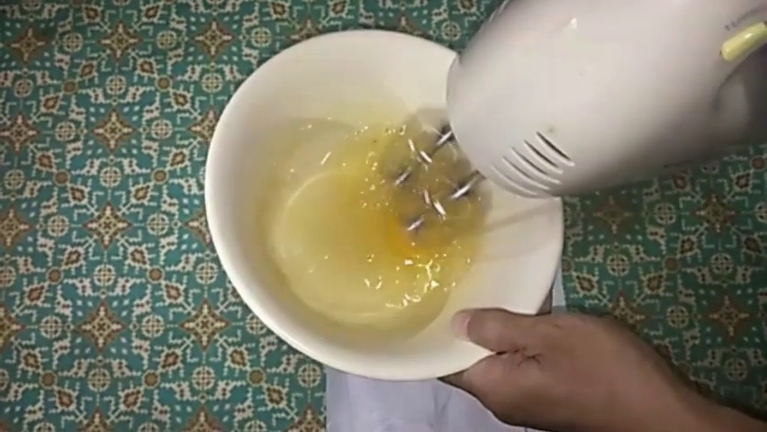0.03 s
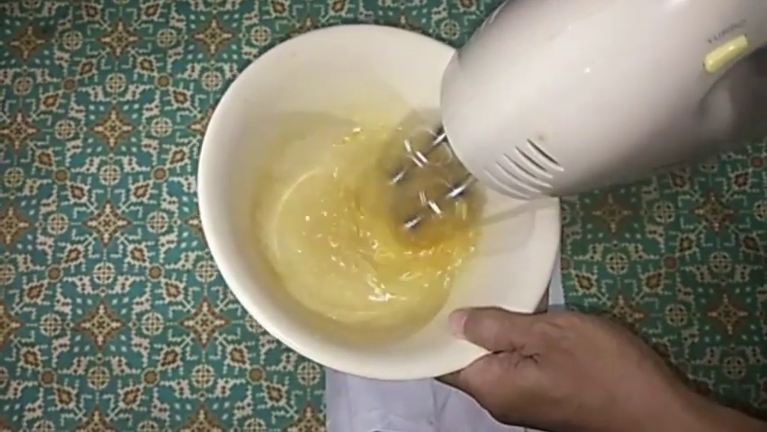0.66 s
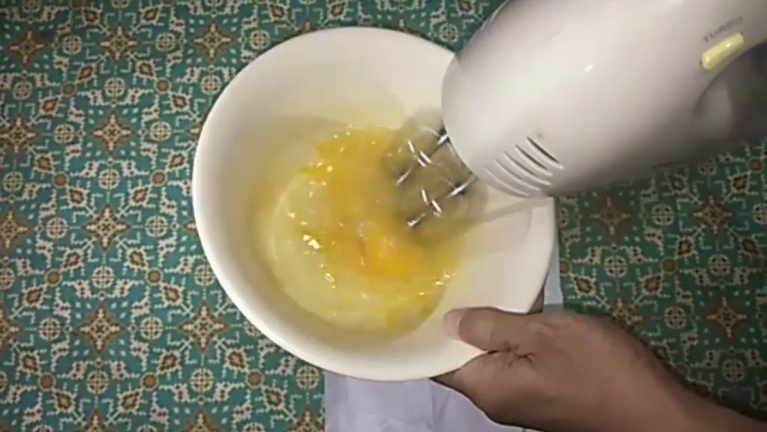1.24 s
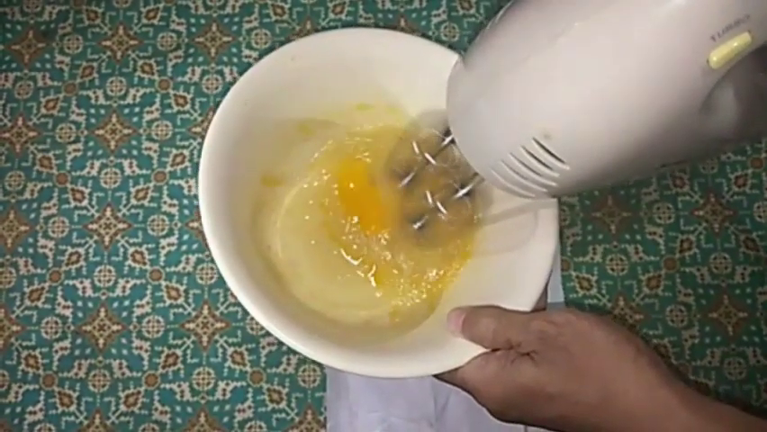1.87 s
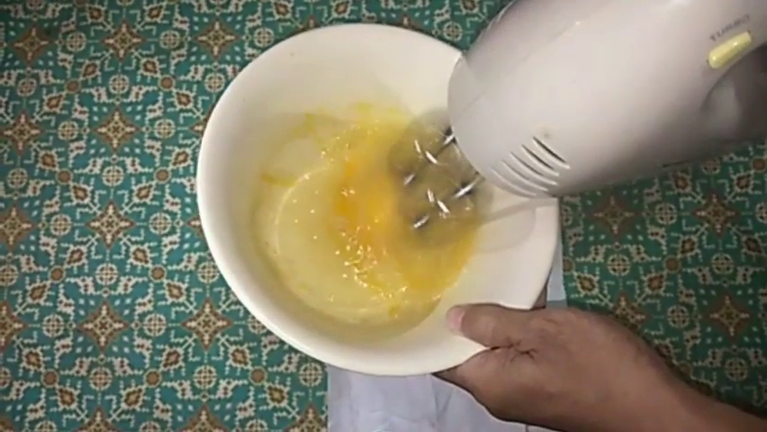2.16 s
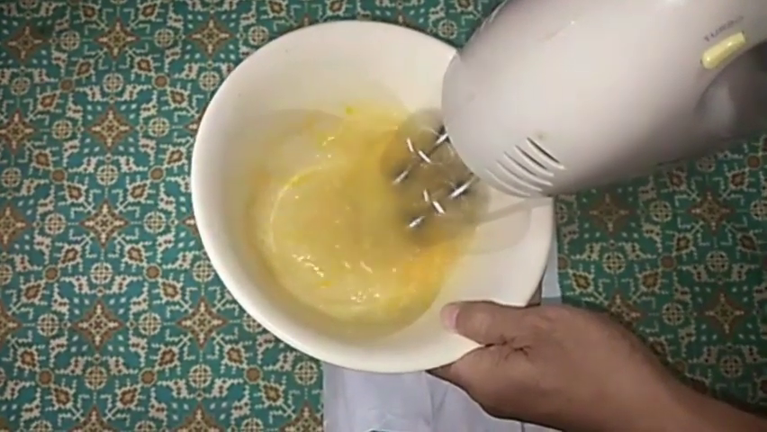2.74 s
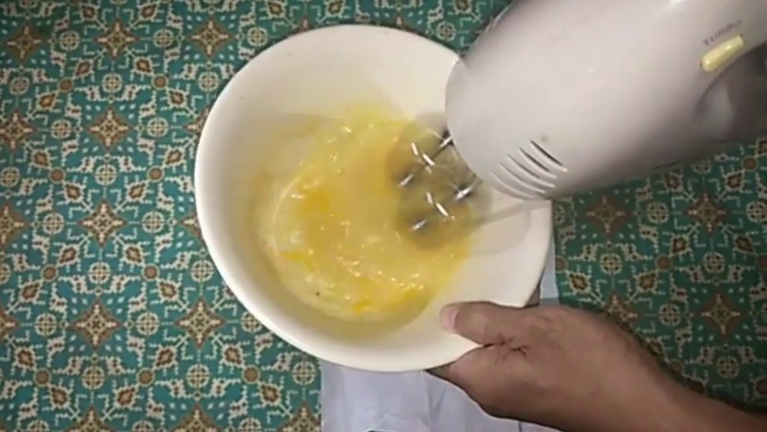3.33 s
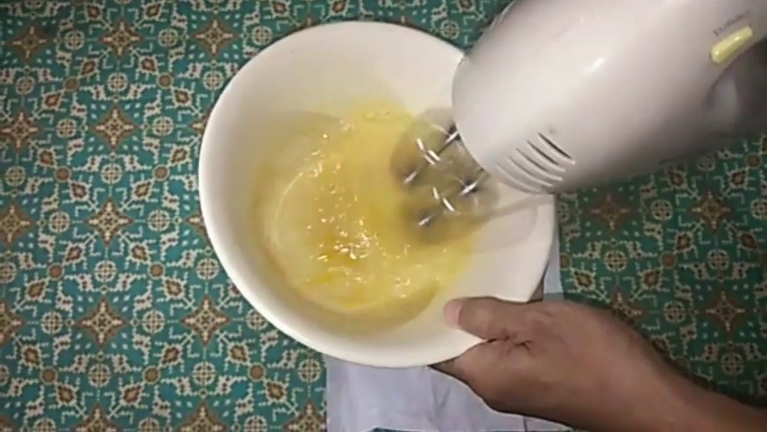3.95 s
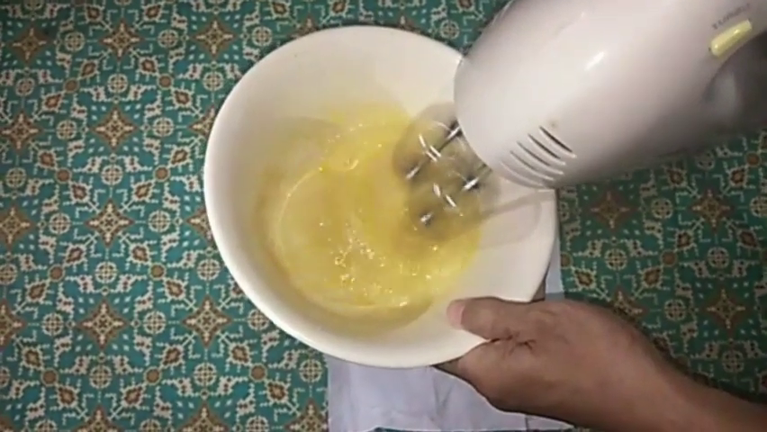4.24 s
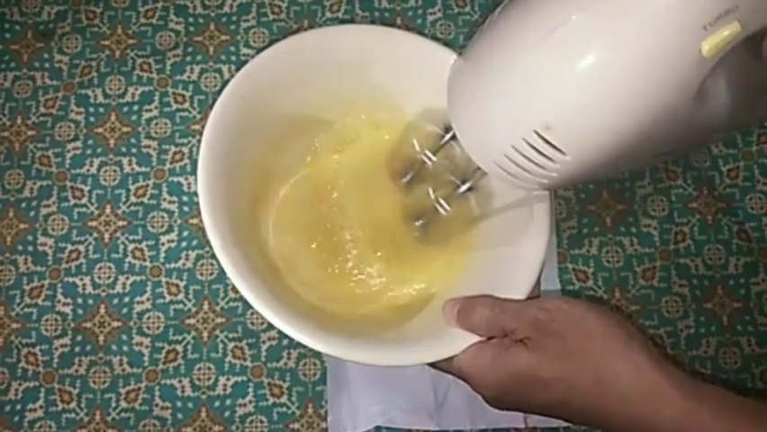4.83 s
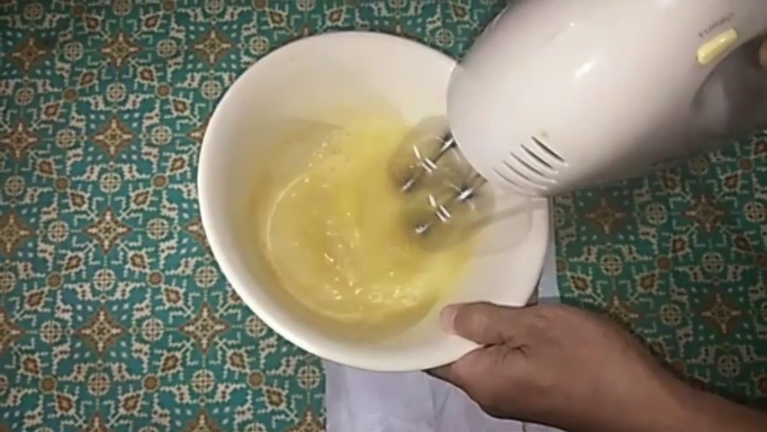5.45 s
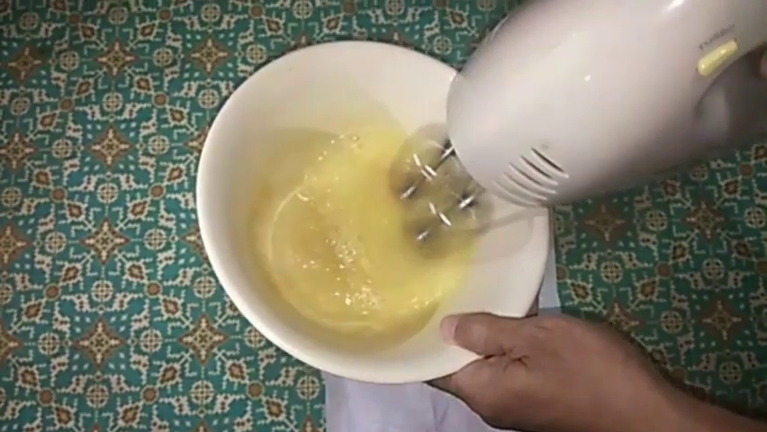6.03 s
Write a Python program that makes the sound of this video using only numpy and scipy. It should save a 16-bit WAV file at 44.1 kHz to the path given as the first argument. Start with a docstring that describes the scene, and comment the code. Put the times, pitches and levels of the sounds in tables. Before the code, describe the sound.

The steady motor whine of a hand mixer beating eggs, with soft sloshing, small wet ticks and a light knock on the bowl.

```python
"""In a kitchen, an electric hand mixer beats raw eggs in a bowl.
One shaft sets the pitch of every motor tone: unbalance hums, rotor slots and commutator bars whine,
and a worm gear turns two beaters, while the cooling fan gives a turbulent rush. The blades swish
through the egg, excite the hollow of the bowl, throw droplets against it and briefly knock on its wall."""
import sys
import numpy as np
from scipy import signal
from scipy.fft import rfft, irfft, next_fast_len
from scipy.io import wavfile
from scipy.ndimage import map_coordinates

SR = 44100
rng = np.random.default_rng(int(sys.argv[2]) if len(sys.argv) > 2 else 0)


def master(y):
    """Save y as 16-bit WAV."""
    cut = np.clip(np.atleast_2d(y).T, -1, 1)
    pcm = np.round(cut * 32767)  # scale
    wavfile.write(sys.argv[1], SR, pcm.astype(np.int16))


N = 272979
TIME = np.arange(N) / SR
SLOTS, BARS, GEAR_RATIO, BLADES = 12, 24, 20, 4
LEFT_LAG_S = 9e-5


def amp(db):
    """Decibels to amplitude ratio."""
    return 10 ** (np.asarray(db) / 20)


def unit(x):
    """Normalisation to rms 1."""
    return x / np.sqrt(np.mean(x ** 2) + 1e-20)


def curves(rows):
    """Linear interpolation of each column after the time, one value per sample."""
    seconds, *columns = np.transpose(rows)
    return [np.interp(TIME, seconds, column) for column in columns]


def wobble(rate):
    """Smooth random modulation: a spline through rate knots a second."""
    knots = rng.standard_normal(int(N * rate / SR) + 4)
    coarse = np.arange(0, N + 32, 32)
    return np.interp(np.arange(N), coarse, map_coordinates(knots, [coarse * rate / SR]))


def filtered(x, response):
    """Linear filtering: the spectrum is multiplied by a frequency response."""
    size = next_fast_len(N + SR // 4)
    return irfft(rfft(x, size) * response(np.fft.rfftfreq(size, 1 / SR)), size)[..., :N]


def coloured(x, points):
    """Spectral shaping of white noise of rms 1 to points of frequency and density in dB."""
    knots_hz, db = np.transpose(points)
    return filtered(x, lambda hz: amp(np.interp(np.log(hz + 1), np.log(knots_hz), db))) * np.sqrt(SR / 2)


def placed(x, pan_db):
    """Time and level differences give direction: the left lags, and is pan_db above the right."""
    left = filtered(x, lambda hz: np.exp(-2j * np.pi * hz * LEFT_LAG_S))
    return np.array([left * amp(pan_db / 2), x * amp(-pan_db / 2)])


def ping(t, hz, cycles):
    """Damped oscillation: a wet tick whose envelope peaks at 1 after the given cycles."""
    age = t * hz / cycles
    return age * np.exp(1 - age) * np.sin(2 * np.pi * hz * t)


def kitchen(x, t60=0.14, wet_db=-14):
    """Reverberation: hard nearby walls add a short, exponentially decaying tail."""
    t = np.arange(SR // 3) / SR
    tail = rng.standard_normal((2, len(t))) * amp(-60 * t / t60) * (t > .003)
    return x + amp(wet_db) * signal.fftconvolve(x, tail / np.linalg.norm(tail[0]), axes=1)[:, :N]


# Air through the vents. Each row: frequency in Hz, left and right spectral density in dB.
VENT_SPECTRUM = [(774, -83.5, -90), (1119, -58.5, -65.5), (1503, -67, -69), (1517, -76.5, -78),
                 (1710, -66, -66.5), (2600, -66.5, -67.5), (3470, -70.5, -70.5), (4100, -60.5, -70.5),
                 (4660, -74, -71), (6840, -69, -72.5), (7980, -66.5, -86), (9650, -75, -89),
                 (12400, -79.5, -103), (15500, -87, -80)]
def cooling_fan(angle, chop=.16, rattle_depth=.18, coherence=0.6, crossover_hz=1700):
    """Amplitude-modulated turbulence: the shaft chops the highs and the gear rattles the lows."""
    turn = angle / GEAR_RATIO
    diffuse = rng.standard_normal((2, N))
    common = placed(rng.standard_normal(N), pan_db=-3)
    rattle = 1 + rattle_depth * (-.8 * np.sin(turn) + .6 * np.cos(2 * turn) + np.cos((BLADES + 1) * turn))
    low = (np.sqrt(coherence) * common + np.sqrt(1 - coherence) * diffuse) * rattle
    high = rng.standard_normal((2, N)) * (1 + chop * np.cos(angle) + chop / 2 * np.cos(2 * angle))
    low_share = lambda hz: 1 / (1 + (hz / crossover_hz) ** 6)
    flow = filtered(low, lambda hz: np.sqrt(low_share(hz)))
    flow += filtered(high, lambda hz: np.sqrt(1 - low_share(hz)))
    flow *= amp(0.5 * wobble(6))
    return np.array([coloured(flow[ear], np.array(VENT_SPECTRUM)[:, [0, ear + 1]]) for ear in range(2)])


# Gear tones. Each row: multiple of the beater rate, relative level in dB.
GEAR_HARMONICS = [(6, -62.5), (12, -59), (19, -71), (21, -53.5), (22, -59), (25, -56), (35, -44),
                  (41, -50.5), (42, -48), (61, -47), (65, -55), (71, -45), (85, -54), (87, -57), (125, -47)]
# The harmonic just above the blade-passing tone. Each row: time in seconds, relative level in dB.
THRUM_LEVELS = [(0.0, -60), (2.25, -57.0), (2.55, -53.0), (3.0, -58), (3.55, -48.5), (3.95, -59.0),
                (4.75, -55.0), (5.4, -65.0), (5.75, -57.0), (6.19, -59)]
# Housing rumble. Each row: frequency in Hz, spectral density in dB.
HOUSING_SPECTRUM = [(25, -101), (48, -98), (66, -78), (105, -74.5), (160, -82), (250, -78), (330, -69),
                    (450, -73.5), (900, -72), (1300, -79.5), (2500, -120)]
def worm_gear(turn, shaft_hz, waver_db=3.0, gain_db=-3.0, usual_shaft_hz=343):
    """Forced vibration: the gear shakes the housing in a pattern that repeats every beater turn."""
    thrum_db, = curves(THRUM_LEVELS)
    blade_db = -59 + 2.5 * (shaft_hz - usual_shaft_hz)  # faster blades shake harder
    tones = np.zeros(N)
    for k, db in [(BLADES, blade_db), (BLADES + 1, thrum_db - 2), *GEAR_HARMONICS]:
        level = amp(db + gain_db + waver_db * wobble(9))
        tones += level * np.sin(k * turn + rng.uniform(0, 2 * np.pi) + .5 * wobble(6))
    rumble = coloured(rng.standard_normal(N), HOUSING_SPECTRUM)
    return placed(np.sqrt(2) * tones + rumble, pan_db=2)


# Narrow modes of housing and room. Each row: centre in Hz, half width in Hz, lift in dB.
NARROW_MODES = [(1729, 5, 3.5), (2402, 6, 6), (2729, 5.5, 9), (3090, 6, 7), (8190, 9, 7), (8228, 14, 2.5),
                (8254, 7, 6), (8525, 14, 7), (8605, 22, 8), (12270, 24, 9), (12350, 12, 4), (12430, 38, 7)]
def resonance(hz):
    """Resonance: the lift in dB of a tone as its pitch drifts across a mode."""
    grid = np.arange(SR // 2)
    lift_db = sum(db * np.exp(-((grid - centre) / width) ** 2) for centre, width, db in NARROW_MODES)
    return np.interp(hz, grid, lift_db)


# Motor hum. Each row: multiple of the shaft rate, left and right level in dB.
SHAFT_HARMONICS = [(1, -41, -43.5), (2, -37.5, -36.5), (3, -42, -46.5), (4, -50, -55), (5, -40.5, -51),
                   (7, -47, -50), (8, -46, -51), (9, -51, -54), (10, -51, -53), (11, -52, -48),
                   (13, -56, -55), (14, -54, -47), (15, -58, -46), (16, -53, -48), (18, -54, -58),
                   (19, -55, -54), (20, -50, -58), (21, -49, -59), (22, -50, -56), (23, -46, -57),
                   (25, -47, -65), (26, -53, -56), (27, -52, -65), (28, -53, -62), (29, -53, -63),
                   (30, -57, -64), (32, -53, -68), (33, -51, -72), (35, -58, -68), (36, -51, -61),
                   (37, -59, -64), (38, -56, -63), (39, -58, -61), (41, -63, -65)]
def shaft_hum(angle, shaft_hz, flutter_db=2, drift_db=1.5, jitter_rad=0.031):
    """Rotating unbalance drives a harmonic series; brush and bearing play make its upper tones waver."""
    out = np.zeros((2, N))
    shaken = angle + jitter_rad * wobble(70)
    lag_angle = LEFT_LAG_S * SR * angle[-1] / N
    for k, left_db, right_db in SHAFT_HARMONICS:
        looseness = min(k / 4, 1)
        lift_db = resonance(k * shaft_hz) + flutter_db * looseness * wobble(40)
        for ear, db in enumerate((left_db, right_db)):
            # short waves change phase on each side as the hand moves
            path_phase = ear * k * lag_angle + (k > 3) * wobble(1.2)
            level = amp(db + lift_db + drift_db * looseness * wobble(2.54))
            out[ear] += level * np.sin(k * shaken + path_phase)
    return np.sqrt(2) * out


# The slot tone beams about as the hand moves.
# Each row: time in seconds, left and right relative level in dB.
SLOT_BEAM = [(0.0, -30.5, -41), (0.44, -27.5, -38), (0.6, -32, -42.0), (0.85, -28.5, -44),
             (1.7, -28.5, -45.0), (1.95, -31.5, -38.0), (2.85, -28.0, -48), (3.07, -39, -45),
             (3.35, -34.5, -34), (3.5, -26.5, -38), (3.8, -31.5, -39), (4.4, -29.5, -39),
             (4.85, -23.5, -37), (5.02, -28.5, -30.5), (5.6, -34.5, -33.5), (5.75, -29.5, -38),
             (6.19, -29.5, -36)]
def motor_whine(angle, shaft_hz, mains_hz=50, rough_rad=0.11, flicker_db=1.2, shadow_db=-16):
    """Slots and bars sound at their passing frequencies; mains and beater load modulate the slot tone."""
    mains = 2 * np.pi * 2 * mains_hz * TIME  # two pulses a cycle
    load = sum(np.sin(k * angle / GEAR_RATIO) / k for k in (1, 2, 3, 5))
    pull = (1 + 0.24 * load + 0.11 * np.cos(mains)) * amp(flicker_db * wobble(21.98))
    slot_phase = SLOTS * angle + 0.1 * np.sin(mains)
    out = np.zeros((2, N))
    for ear, beam_db in enumerate(curves(SLOT_BEAM)):
        level = amp(beam_db - 0.9 + .5 * wobble(8)) * pull
        out[ear] += level * np.sin(slot_phase + rough_rad * wobble(90) + ear * wobble(1.89))
    bar_db = -35 + resonance(BARS * shaft_hz)
    for ear in range(2):
        level = amp(bar_db + ear * shadow_db + flicker_db * wobble(50))
        out[ear] += level * np.sin(BARS * angle + rough_rad * wobble(90) + ear * wobble(1.88))
    return np.sqrt(2) * out


# Wires cutting the egg. Each row: frequency in Hz, relative spectral density in dB.
WIRE_SPECTRUM = [(1200, -22.5), (1850, 0), (2050, -9), (2200, 9), (2450, -10.5), (2620, -3), (2850, 3.5),
                 (3200, -8.5), (3800, -2.5), (5000, -39)]
def wire_swish(turn, catch_db, lumps_db=2.2, base_db=-34.5, thinning_db_per_s=0.37):
    """Flow noise: the wires cut the egg with a wet rustle that eases as the egg thins."""
    level = amp(base_db + 0.65 * catch_db - thinning_db_per_s * TIME)
    strokes = (1 + 0.074 * np.cos(turn)) * amp(lumps_db * wobble(150))
    return level * unit(coloured(rng.standard_normal((2, N)) * strokes, WIRE_SPECTRUM))


# The hollow of the bowl. Each row: frequency in Hz, relative spectral density in dB.
CAVITY_SPECTRUM = [(200, -47), (470, -44), (540, -10), (600, -4.5), (680, -0.5), (750, -7), (850, -23.5),
                   (1100, -18), (2000, -52)]
# The blades gulp a lump of egg. Each row: time of the peak in seconds, swell in dB.
GULP_SWELLS = [(0.42, 4.5), (0.86, 4), (1.25, 4), (1.98, 4), (2.31, 2.5)]
def churn(turn, catch_db, slap=.22, lumps_db=1, base_db=-35, gulp_half_width_s=0.062):
    """Cavity resonance: blades slapping through the egg excite the bowl's hollow, more at each gulp."""
    gulp_db = sum(db * np.exp(-((TIME - peak) / gulp_half_width_s) ** 2) for peak, db in GULP_SWELLS)
    strokes = (1 + slap * np.cos(turn) + slap * np.cos(2 * turn + 1)) * amp(lumps_db * wobble(70))
    slosh = unit(coloured(rng.standard_normal(N) * strokes, CAVITY_SPECTRUM))
    return placed(amp(base_db + 0.51 * catch_db + gulp_db) * slosh, pan_db=-.6)


def spatter(turn, catch_db, count=9000, drop_hz=5650, bunching=.4, base_db=-30.5, pan_db=-18):
    """Shot noise: droplets and bursting bubbles tick at random times, louder as each blade passes."""
    start = rng.integers(0, N, count)
    hz = drop_hz * np.exp(0.078 * rng.standard_normal(count))
    size = amp(1.5 * np.minimum(rng.exponential(size=count), 4)) * rng.choice([-1, 1], count)
    blade_phase = BLADES * turn[start]
    size *= np.exp(bunching * (np.cos(blade_phase) + np.cos(2 * blade_phase) / 2))
    steps = np.arange(SR // 200)
    drops = size[:, None] * ping(steps / SR, hz[:, None], cycles=2)
    spray = unit(np.bincount((start[:, None] + steps).ravel(), drops.ravel(), N)[:N])
    return placed(spray * amp(base_db + 1.34 * catch_db + pan_db / 2), pan_db)


# Egg flicked against the bowl.
# Each row: start in seconds, relative level in dB, pitch in Hz, left minus right in dB.
EGG_FLICKS = [(0.7622, -25, 5133, -7.0), (0.9946, -26, 6130, -5.5), (1.0113, -15, 6210, -1),
              (1.0235, -13.5, 5070, -14), (1.1416, -20, 5050, -13), (1.1727, -22, 5700, -9.0),
              (1.3523, -21, 6100, -4.5), (2.1273, -17.5, 5870, -11), (2.3056, -21, 5800, -5),
              (2.9854, -17.5, 5640, -14), (3.2179, -19, 5660, -7), (3.7504, -24, 5740, -5.5),
              (4.0403, -24, 5880, -13), (5.2701, -23, 5706, -10.0), (5.319, -18.5, 5900, -13)]
def flicks(gain_db=1.0):
    """Impact transients: each flick of egg strikes the bowl with one sharp, quickly damped tick."""
    out = np.zeros((2, N + SR))
    t = np.arange(SR // 5) / SR
    for start, db, hz, pan_db in EGG_FLICKS:
        tick = ping(t, hz, cycles=3.3) * amp(db + gain_db)
        out[:, round(start * SR):][:, :len(t)] += tick * amp([[pan_db / 2], [-pan_db / 2]])
    return out[:, :N]


# Modes of the bowl wall. Each row: frequency in Hz, relative level in dB, 60 dB decay time in seconds.
WALL_MODES = [(759, -11, .03), (1330, -6, .05), (1840, -3, 0.049), (2040, 3, 0.061), (2120, -5.5, .045),
              (2460, -6, .03), (3400, -2.5, .02)]
# A beater strikes the wall. Each row: start in seconds, relative level in dB.
BEATER_KNOCKS = [(1.1434, -11), (1.1876, -18)]
def knocks(gain_db=-9.5, crack_gain=2.9, crack_t60=.012):
    """Free vibration: a beater hits the wet wall with a crack and leaves its modes ringing."""
    out = np.zeros((2, N + SR))
    t = np.arange(SR // 5) / SR
    crack_band = signal.butter(2, (1200, 6000), "bandpass", fs=SR, output="sos")
    for start, db in BEATER_KNOCKS:
        for ear in range(2):
            ring = np.zeros(len(t))
            for hz, mode_db, t60 in WALL_MODES:
                decay = amp(mode_db + rng.normal(0, 1.7) - 60 * t / t60)
                ring += decay * np.sin(2 * np.pi * hz * t + rng.uniform(0, 2 * np.pi))
            crack = signal.sosfilt(crack_band, amp(-60 * t / crack_t60) * rng.standard_normal(len(t)))
            out[ear, round(start * SR):][:len(t)] += amp(db + gain_db) * (ring + crack_gain * crack)
    return out[:, :N]


# The motor sags in the yolks and picks up as they thin. Each row: time in seconds, commutator tone in Hz.
COMMUTATOR_PITCH = [(0.0, 8222.0), (0.35, 8254.0), (1.27, 8171.0), (1.5, 8189.0), (1.97, 8242.0),
                    (2.6, 8207.0), (3.17, 8187.0), (3.9, 8242.0), (4.4, 8249.0), (5.15, 8287.0),
                    (5.85, 8304.0), (6.19, 8302.0)]
# How much egg the blades catch. Each row: time in seconds, amount in dB over the usual.
EGG_CAUGHT = [(0.0, -3.6), (0.45, 0.2), (1.2, 1.9), (1.7, -2.5), (2.15, 2.2), (2.75, -0.5), (3.0, 1),
              (4.75, -1.1), (5.3, 1.6), (6.19, 1)]
def scene():
    """Phase locking: one shaft drives mixer and egg; churn and swish trail the gear by half a turn."""
    shaft_hz = curves(COMMUTATOR_PITCH)[0] / BARS
    catch_db, = curves(EGG_CAUGHT)
    angle = 2 * np.pi * np.cumsum(shaft_hz) / SR
    turn = angle / GEAR_RATIO  # beater angle in radians
    motor = shaft_hum(angle, shaft_hz) + motor_whine(angle, shaft_hz)
    mixer = motor + worm_gear(turn, shaft_hz) + cooling_fan(angle)
    egg = churn(turn + np.pi, catch_db) + wire_swish(turn + np.pi, catch_db)
    return mixer + egg + kitchen(spatter(turn, catch_db) + flicks() + knocks())


def record(dry):
    """Band limiting: an ideal low-pass filter passes nothing above 15.5 kHz."""
    return filtered(dry, lambda hz: hz < 15500)


dry = scene()
out = record(dry)
master(out)
```